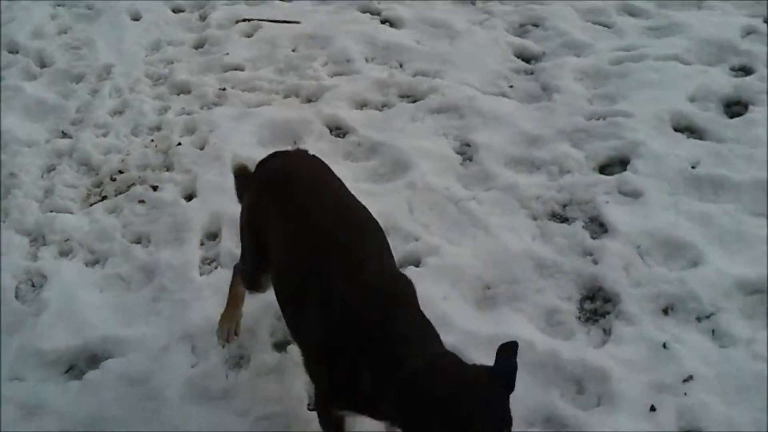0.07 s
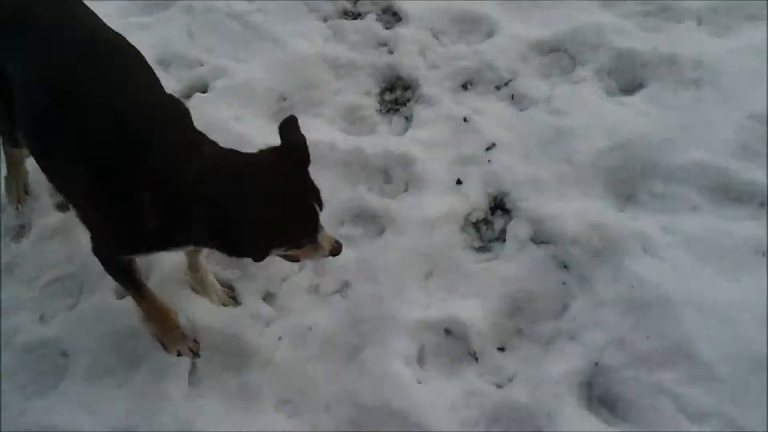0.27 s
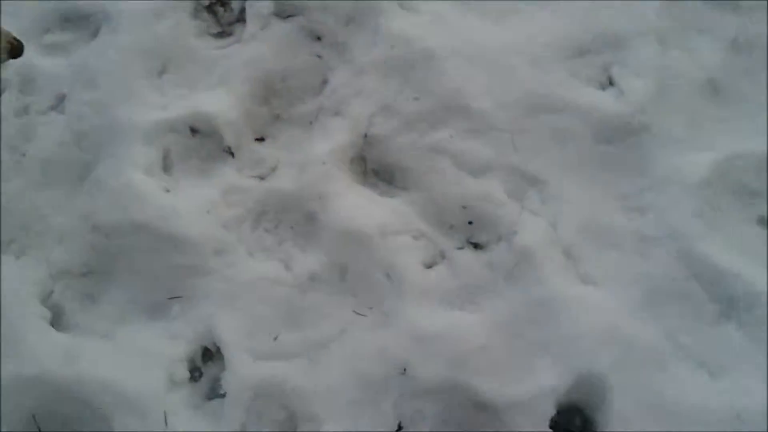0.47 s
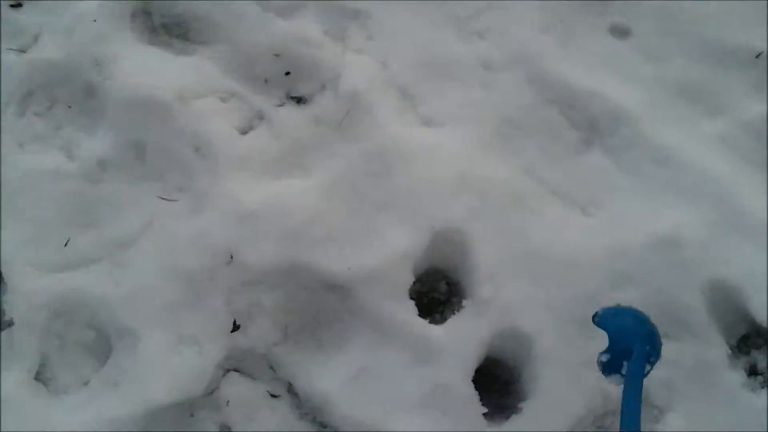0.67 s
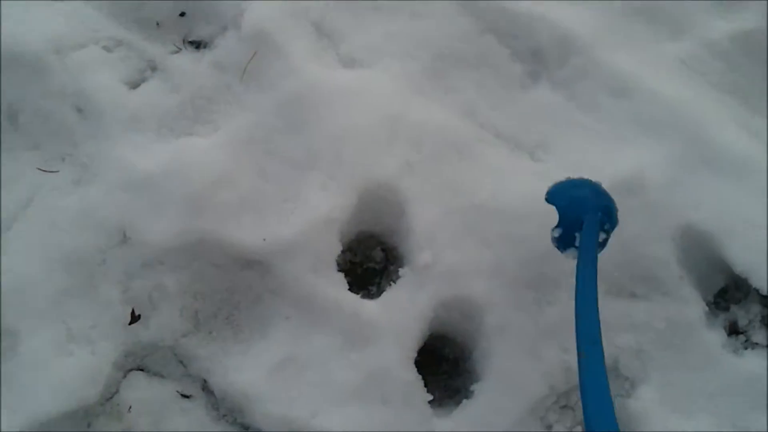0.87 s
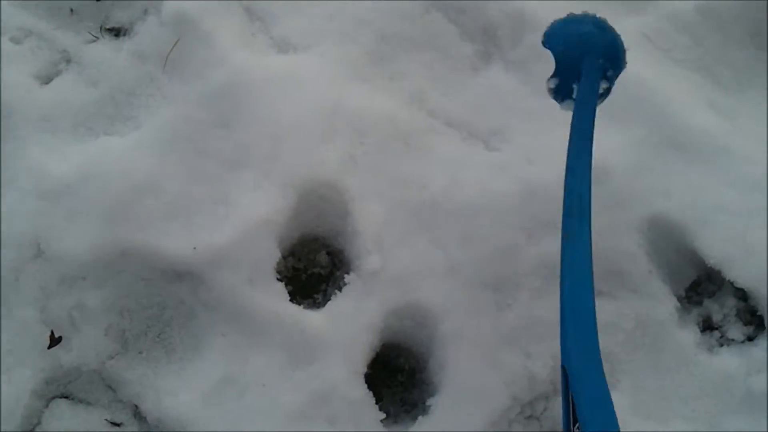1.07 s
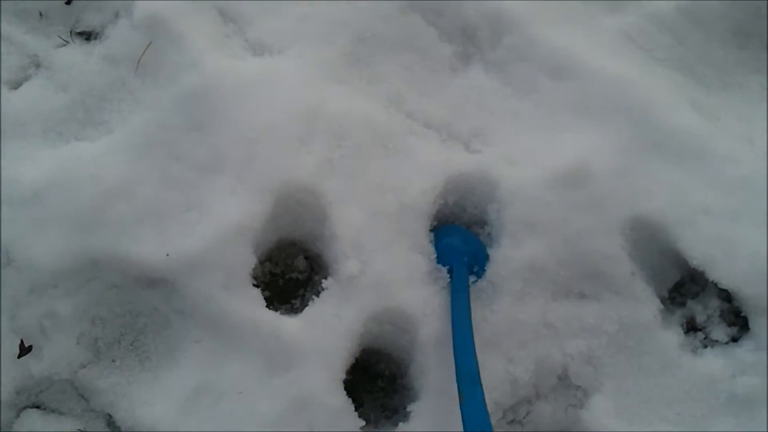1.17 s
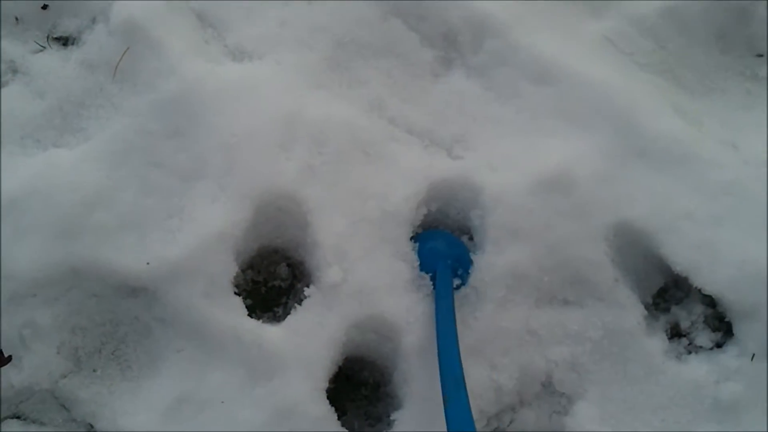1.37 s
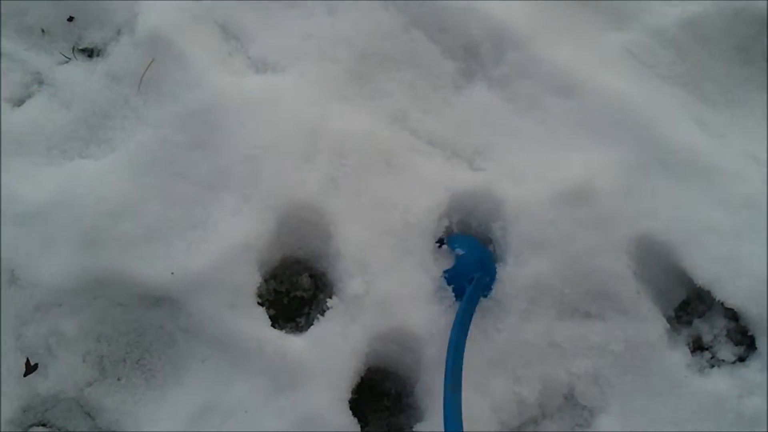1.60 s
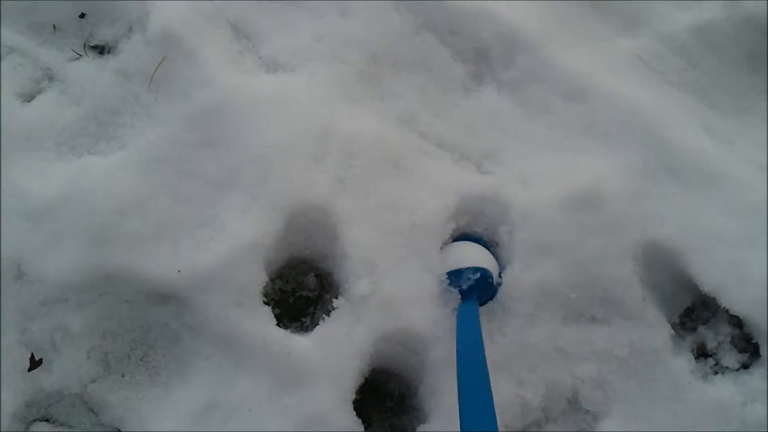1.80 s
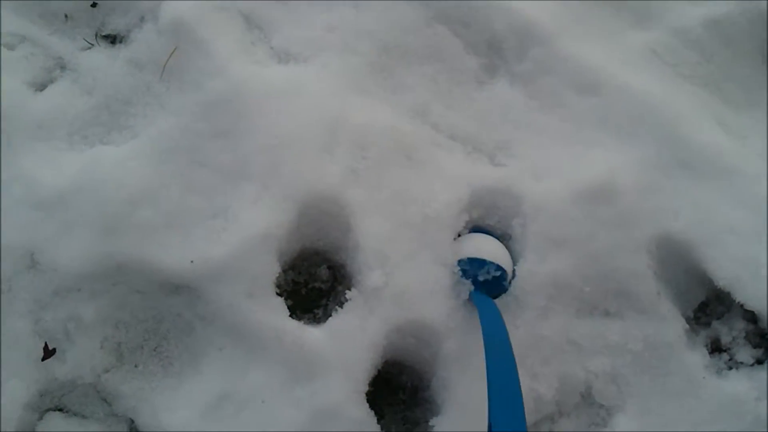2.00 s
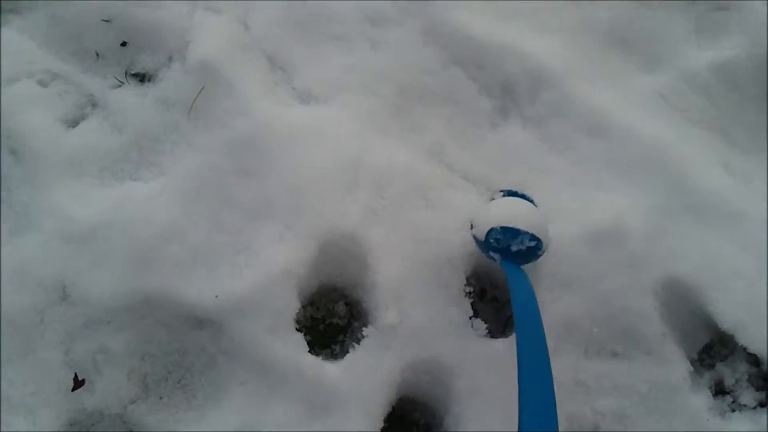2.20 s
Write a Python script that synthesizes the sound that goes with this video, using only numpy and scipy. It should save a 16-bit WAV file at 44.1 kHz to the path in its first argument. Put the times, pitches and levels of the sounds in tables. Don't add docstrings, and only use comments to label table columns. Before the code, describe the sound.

Plastic scoop digging crusty snow up close, after soft footstep crunches, handle knocks and wind buffets

```python
import sys
import numpy as np
from scipy import signal
from scipy.fft import rfft, irfft
from scipy.io import wavfile
from scipy.ndimage import uniform_filter1d

SR = 44100
rng = np.random.default_rng(int(sys.argv[2]) if len(sys.argv) > 2 else 0)


def invert_db(level):
    return 10 ** (np.asarray(level, dtype=float) / 20)


def wrap_up_sound(samples):
    columns = np.atleast_2d(samples).T
    tamed = np.clip(columns, -1, 1)
    steps = np.round(tamed * 32767).astype(np.int16)
    wavfile.write(sys.argv[1], SR, steps)


N = 99225
T = np.arange(N) / SR

# pitch_hz, width_hz, level_db
CUP_MODES = [(1170, 530, -17.5), (2050, 430, -8), (2700, 480, -7), (3580, 1100, -7.5), (4450, 570, -3),
             (5300, 340, -4), (5870, 650, -2.5), (7670, 1300, -7)]


def scoop():
    stab = stabs()
    force = drag() + stab + snaps()
    cup = 0
    for k, (hz, width, db) in enumerate(CUP_MODES):
        polarity = (-1) ** k
        cup = cup + polarity * invert_db(db) * band(force, hz, width)
    rim = invert_db(-13) * band(stab, 5730, 630)
    cup = signal.lfilter(*signal.butter(2, 690, "high", fs=SR), cup + rim)
    return invert_db(8.5) * cup + pings()


# time_s, force_db
DRAG_FORCE = [
    (1.641, -52),
    (1.656, -48),
    (1.69, -38),
    (1.745, -38.5),
    (1.81, -34.5),
    (1.885, -38),
    (1.915, -41),
    (1.955, -35),
    (2.045, -55),
]


def drag():
    pulling = (T > DRAG_FORCE[0][0]) * (T < DRAG_FORCE[-1][0])
    return grains(1500, 4.5, 1.0) * curve(DRAG_FORCE) * pulling * invert_db(1.3 * walk(60.2))


# start_s, rise_s, hold_s, fall_s, level_db
STABS = [
    (0.0, 0.00068, 0.008, 0.006, -42),
    (1.2605, 0.0039, 0.023, 0.014, -26.5),
    (1.645, 0.011, 0.0087, 0.024, -39),
    (1.757, .002, .003, .008, -44),
    (1.779, 0.004, 0.0071, 0.011, -44.5),
    (1.8318, 0.0015, .011, 0.01, -37.5),
    (1.849, 0.0015, 0.0036, 0.0075, -52),
    (1.872, 0.0012, 0.0087, 0.0078, -37),
    (2.182, 0.0014, 0.048, 0.061, -45),
]


def stabs():
    return grains(3000, 6.0, 1.0) * bursts(STABS) * invert_db(0.43 * walk(560))


# time_s, level_db
SNAPS = [
    (1.8015, -10),
    (1.808, -19),
    (1.8797, -16),
    (1.91, -18),
    (1.9327, -22.5),
    (1.98, -20),
    (2.006, -28),
]


def snaps():
    out = np.zeros(N)
    s, db = np.array(SNAPS).T
    out[(s * SR).astype(int)] = invert_db(db)
    return out


# start_s, peak_db, pitch_hz, length_cycles
PINGS = [(1.265, -21, 6100, 10), (1.2672, -18.5, 7500, 10), (1.2687, -14, 6320, 4.4),
         (1.269, -21.5, 2130, 7), (1.2722, -23, 5600, 12), (1.2745, -24.5, 7200, 7.6),
         (1.276, -13, 6150, 6.1), (1.2772, -25, 4320, 8), (1.2782, -17, 5300, 5.6), (1.2815, -18, 6100, 7),
         (1.2827, -17, 3500, 2.4), (1.2837, -12, 5900, 3.8), (1.2864, -15.5, 6030, 8.45),
         (1.289, -22, 4550, 6.5), (1.291, -24, 6260, 3.6), (1.6595, -31.5, 6500, 8), (1.6645, -39, 4470, 8),
         (1.666, -33, 6400, 8), (1.709, -40, 4570, 14), (1.7145, -31, 4400, 10), (1.722, -32, 6100, 8),
         (1.726, -33, 4440, 8), (1.732, -41, 5660, 8), (1.759, -33, 5250, 5), (1.781, -37, 2000, 4.7),
         (1.7905, -29, 6200, 8), (1.793, -39, 2140, 4.8), (1.8, -36, 2050, 4.7), (1.8095, -32, 5370, 8),
         (1.8115, -39, 2050, 4.8), (1.8135, -28, 6200, 5.5), (1.82, -36, 2150, 3.4),
         (1.8326, -29, 5400, 2.8), (1.8329, -25, 3950, 4), (1.838, -25, 5770, 4.4), (1.8395, -24, 4530, 8),
         (1.843, -24, 5300, 5.2), (1.851, -28, 4600, 6.1), (1.855, -30, 5860, 8), (1.8708, -22, 5480, 2),
         (1.879, -29, 6000, 4), (1.9009, -21, 4600, 6), (1.9012, -20, 6100, 5.4), (1.9012, -29, 2600, 1.3),
         (1.9093, -28, 4600, 3), (1.933, -31, 4450, 5), (1.949, -33, 4470, 8), (1.969, -39, 4500, 6),
         (1.973, -32, 6300, 8), (2.231, -32, 5740, 4)]


def pings():
    return thumps(PINGS, 0.003)


# start_s, length_s, pitch_hz, width_hz, level_db
CREAKS = [
    (0.566, 0.013, 6600, 1500, -42),
    (0.61, 0.031, 2270, 1480, -35.5),
    (0.782, 0.017, 6270, 1300, -45.5),
    (1.758, 0.092, 2020, 150, -47),
    (1.873, 0.043, 2120, 500, -45.5),
    (2.031, 0.15, 3580, 60, -60.5),
    (2.06, 0.072, 4500, 60, -64),
]


def creak():
    out = 0
    for s, length, hz, width, db in CREAKS:
        tone = unit(band(grains(900, 1.8, 0.7), hz, width))
        out = out + tone * bursts([(s, .015, length, .02, db)])
    return out


# freq_hz, density_db
CRUNCH = [(120, -40.5), (220, -4.5), (450, 1.5), (1270, -2), (2300, -7), (3700, -6), (6500, -9), (8000, -9)]
# start_s, rise_s, hold_s, fall_s, level_db
STEPS = [
    (.305, 0.0025, 0.0055, 0.0055, -42),
    (.5065, 0.002, 0.003, 0.004, -32),
    (.574, .003, 0.045, 0.084, -37),
    (.61, 0.016, 0.017, 0.0068, -36.5),
    (.795, 0.0094, 0.013, 0.12, -35.5),
    (.932, 0.0027, 0.0046, 0.0091, -53),
    (1.117, 0.0031, 0.013, 0.023, -35.5),
]


def steps():
    return colour(grains(4500, 2.5, 1.0), CRUNCH) * bursts(STEPS) * invert_db(1.3 * walk(350))


# freq_hz, density_db
RUSTLE = [(150, -4.5), (400, 2), (900, 2.5), (1600, -2.5), (2800, -3), (4200, -3), (6500, -4), (7800, -10)]
# time_s, movement_db, crispness_db
MOVEMENT = [(0, -59, 18.5), (.02, -51, 7.5), (.11, -43.5, 4), (.16, -48, 3), (.28, -51.5, 4),
            (.36, -42, -3), (.43, -36.5, -8.5), (.57, -36, -5.5), (.72, -37, -10.5), (.9, -38.5, -2.5),
            (1.0, -38.5, -5), (1.11, -42, -2), (1.24, -47, 0), (1.33, -45, 2), (1.45, -45, -3),
            (1.6, -52.5, -4.5), (2.25, -53.5, 2)]


def rustle():
    s, movement_db, crisp_db = np.array(MOVEMENT).T
    x = colour(grains(4000, 3.85, 1.0), RUSTLE)
    top = signal.filtfilt(*signal.butter(2, 4600, "high", fs=SR), x)
    mixed = x - top + top * curve(np.c_[s, crisp_db])
    return mixed * curve(np.c_[s, movement_db]) * invert_db(0.36 * walk(25))


# start_s, peak_db, pitch_hz, length_cycles
KNOCKS = [(.106, -29.5, 593, 1.38), (.4445, -28, 696, 0.9), (.4963, -25, 2580, 3.4),
          (.4965, -30, 3800, 3.4), (.5068, -24, 322, 1.76), (.5078, -32.5, 860, 3.1),
          (.5091, -28, 4200, 1.6), (.5099, -24, 2300, 1.16), (.509, -33, 7150, 4), (.5945, -24.5, 600, 1.1),
          (.6145, -27, 2320, 4.9), (.6265, -21.5, 2140, 2.1), (.627, -30, 555, 1.4), (.632, -31, 407, 2.98),
          (.607, -35, 600, 1.95), (.6295, -29, 2280, 4.3), (.6335, -24, 930, 2), (.636, -20, 2410, 2.5),
          (.6435, -32, 1116, 1.8), (.6455, -38, 2300, 2.7), (.6482, -22, 2310, 0.99),
          (.6495, -26, 695, 1.4), (.6572, -20.5, 1026, 1.72), (.6575, -36.5, 2240, 1.2),
          (.766, -34, 2700, 4.7), (.809, -27.5, 780, 1.25), (.9365, -28, 2700, 2.7),
          (.939, -25.5, 335, 1.84), (.9398, -18.5, 773, 3.05), (.9415, -33, 1970, 1.7),
          (1.1225, -24, 690, 1.28), (1.123, -35, 274, 2.2), (1.2833, -17.5, 797, 1.58),
          (1.284, -19.5, 1180, 2), (1.2765, -28, 2010, 5.43), (1.2845, -27, 2320, 4.2),
          (1.2652, -29, 1910, 3.3), (2.172, -36.5, 1210, 3.6)]


def knocks():
    return thumps(KNOCKS, 0.0049)


# time_s, level_db
GUST = [
    (0, -54),
    (.18, -49.5),
    (.34, -35.5),
    (.47, -46.5),
    (.65, -50),
    (.8, -50.5),
    (1.2, -49),
    (1.45, -53),
    (2.25, -51),
]
# start_s, peak_db, pitch_hz, length_cycles
BUFFETS = [(.1, -34, 126.4, 0.73), (.196, -33.5, 130, 1.54), (.226, -34, 146, 1.76), (.243, -32, 161, 2.8),
           (.297, -27.5, 158, 1.8), (.314, -19.5, 120, 2.08), (.327, -24, 157, 2.4),
           (.327, -39.5, 335, 2.8), (.343, -27, 245, 2.37), (.346, -39.5, 385, 2.5), (.353, -30, 85, 1.5),
           (.37, -28.5, 220, 1.93), (.372, -43, 378, 1.8), (.393, -31, 170, 0.72), (.412, -42, 140, 0.89),
           (.43, -42, 150, 0.86), (.449, -26, 106, 1.5), (.481, -35.5, 80, 1), (.483, -31, 200, 1.26),
           (.55, -33, 118, 1.5), (.62, -38, 75, 1.4), (1.04, -45, 64, 1.9), (1.204, -33.5, 121, 1.05),
           (1.42, -38.5, 93.7, 2.63), (1.5, -47, 110, 2.7), (1.775, -40, 127, 1.4)]


def wind():
    flutter_hz, width_hz = 98.2, 234
    flutter = unit(band(rng.standard_normal(N), flutter_hz, width_hz))
    flutter = unit(signal.lfilter(*signal.butter(2, 3 * flutter_hz, fs=SR), flutter))
    return flutter * curve(GUST) * invert_db(1.8 * walk(22)) + thumps(BUFFETS, -0.0054)


# freq_hz, density_db
TRAFFIC = [(30, -28.5), (120, -6), (300, -15.5), (650, -9), (980, -4.5), (1500, -13), (3500, -30),
           (8000, -34)]


def traffic():
    level_db = -45 + 0.98 * walk(5.37) + 1.3 * walk(18)
    return colour(rng.standard_normal(N), TRAFFIC) * invert_db(level_db)


def grains(rate_hz, spread_db, smooth):
    chance, side, size = rng.random((3, N))
    size_db = np.minimum(-spread_db * np.log(size + 1e-9), 3 * spread_db)
    clicks = (chance < rate_hz / SR) * np.sign(side - .5) * invert_db(size_db)
    return unit(clicks) + smooth * rng.standard_normal(N)


def bursts(rows):
    out = 0
    for s, rise, hold, fall, db in rows:
        attack = np.clip((T - s) / rise, 0, 1) ** 2
        decay = np.exp(-np.clip(T - s - rise - hold, 0, 1) / fall * 2)
        out = out + invert_db(db) * attack * decay
    return out


def thumps(rows, sag):
    out = 0
    for s, db, hz, cycles in rows:
        u = np.clip((T - s) * hz, 0, 40)
        v = u / cycles * 4
        swell = (v / 2) ** 2 * np.exp(2 - v)
        bend = 1 - sag * np.minimum(v, 8)
        out = out - invert_db(db) * swell * np.cos(2 * np.pi * (u - cycles / 2) * bend)
    return out


def band(x, hz, width_hz):
    return signal.lfilter(*signal.iirpeak(hz, hz / width_hz, SR), x)


def colour(x, rows):
    hz, db = np.array(rows).T
    log_hz = np.log(np.arange(N // 2 + 1) * SR / N + 1)
    return unit(irfft(rfft(x) * invert_db(np.interp(log_hz, np.log(hz), db)), N))


def curve(rows):
    return invert_db(np.interp(T, *np.array(rows).T))


def walk(rate_hz):
    k = int(SR / rate_hz)
    held = np.repeat(rng.standard_normal(N // k + 1), k)
    return unit(uniform_filter1d(uniform_filter1d(held, k), k)[:N])


def unit(x):
    return x / np.sqrt(np.mean(x ** 2))


def scene():
    mono = scoop() + creak() + steps() + rustle() + knocks() + wind() + traffic()
    return np.array([mono, mono])


# freq_hz, gain_db
MICROPHONE = [(6900, 0), (7500, -7), (7800, -15), (8000, -24), (8290, -32), (8340, -65)]


def microphone(dry):
    top = invert_db(np.interp(np.arange(N // 2 + 1) * SR / N, *np.array(MICROPHONE).T))
    dull = irfft(rfft(dry) * top, N)
    cut = signal.sosfilt(signal.butter(2, 53, "high", fs=SR, output="sos"), dull)
    return cut + invert_db(-101) * rng.standard_normal(dry.shape)


def band_limit(x):
    return signal.sosfilt(signal.butter(12, 8330, fs=SR, output="sos"), x)


def record(dry):
    mix = microphone(dry)
    return band_limit(mix)


dry = scene()
out = record(dry)
wrap_up_sound(out)
```